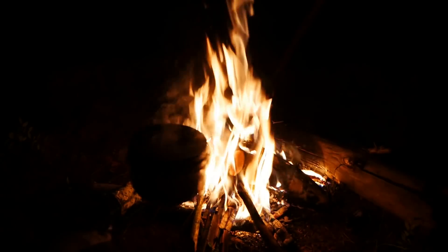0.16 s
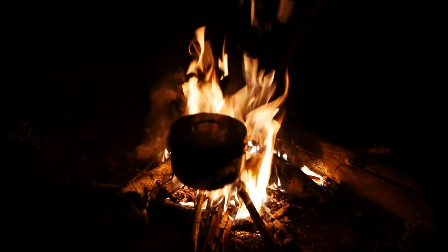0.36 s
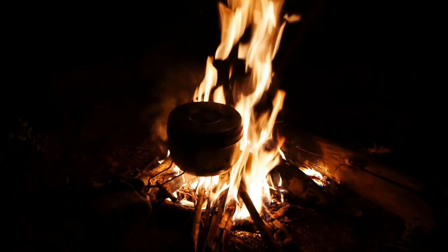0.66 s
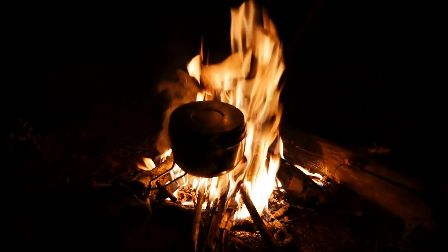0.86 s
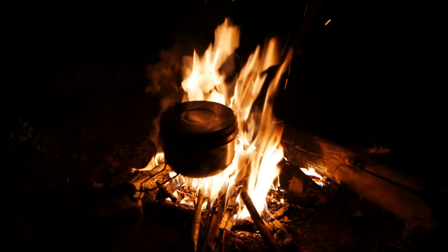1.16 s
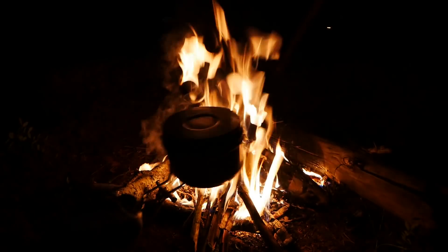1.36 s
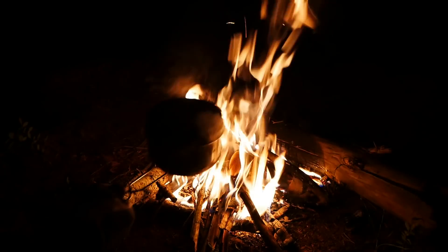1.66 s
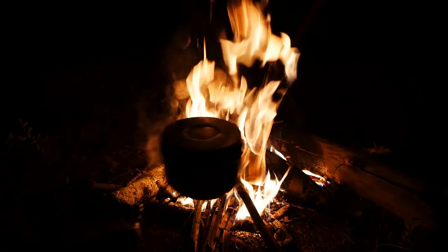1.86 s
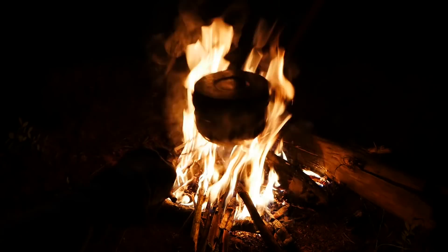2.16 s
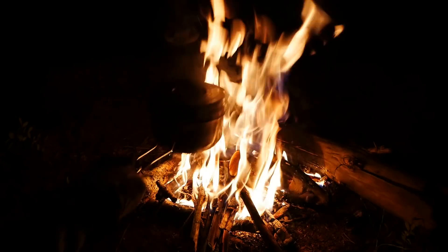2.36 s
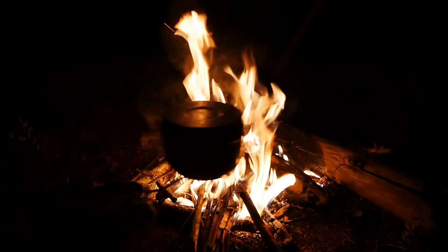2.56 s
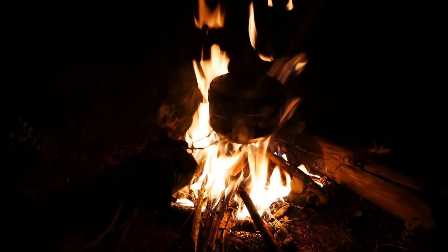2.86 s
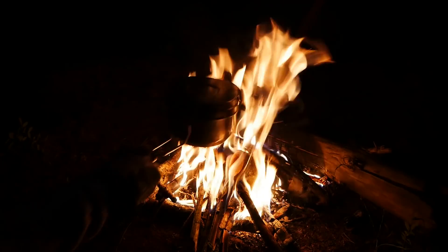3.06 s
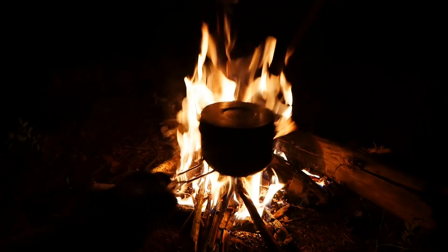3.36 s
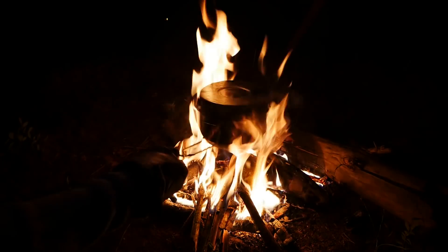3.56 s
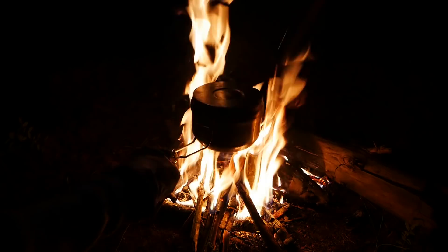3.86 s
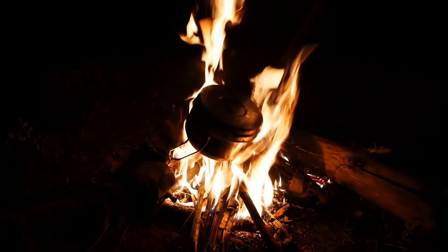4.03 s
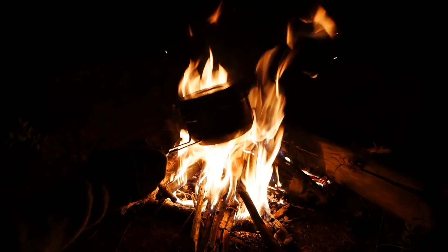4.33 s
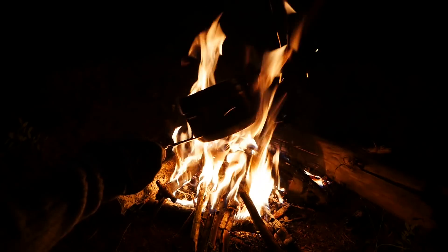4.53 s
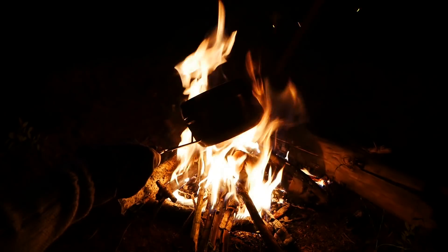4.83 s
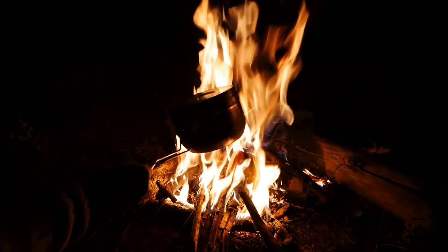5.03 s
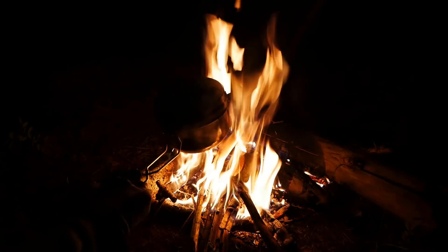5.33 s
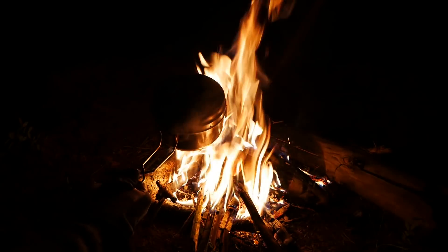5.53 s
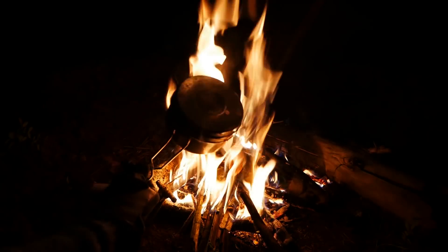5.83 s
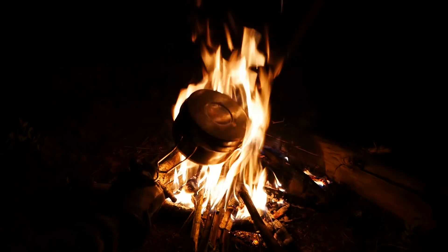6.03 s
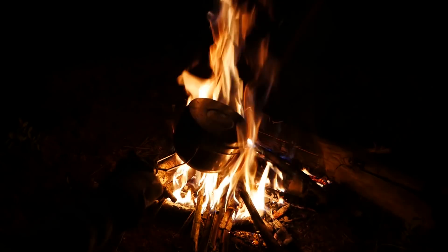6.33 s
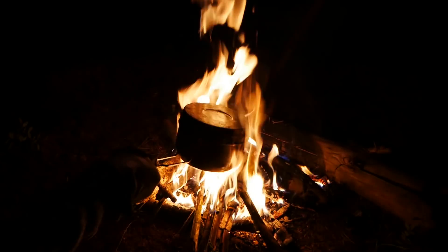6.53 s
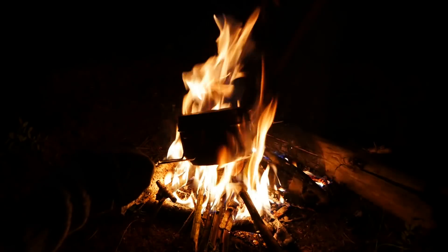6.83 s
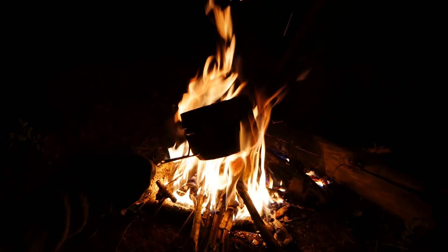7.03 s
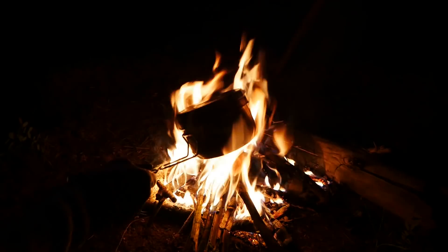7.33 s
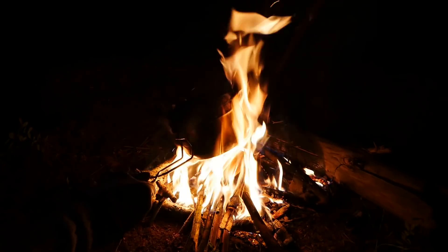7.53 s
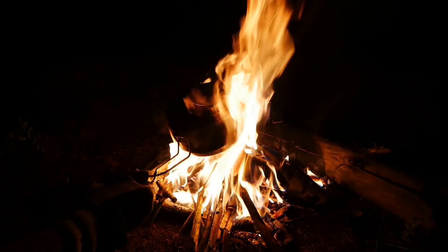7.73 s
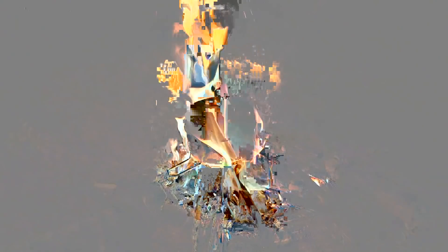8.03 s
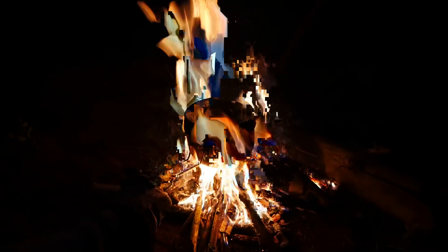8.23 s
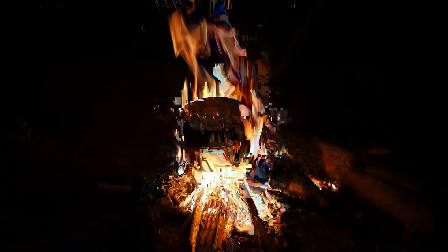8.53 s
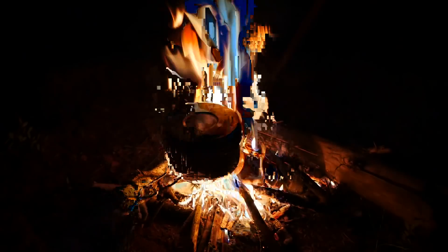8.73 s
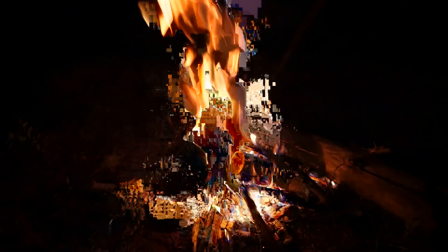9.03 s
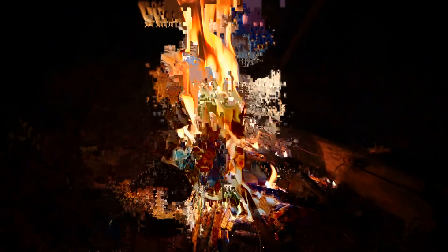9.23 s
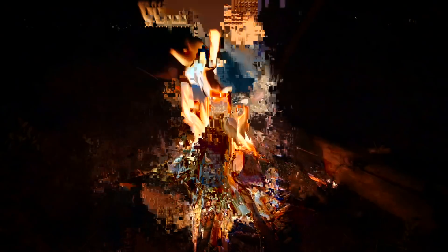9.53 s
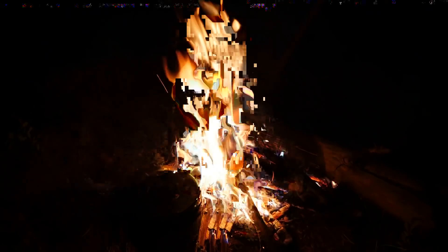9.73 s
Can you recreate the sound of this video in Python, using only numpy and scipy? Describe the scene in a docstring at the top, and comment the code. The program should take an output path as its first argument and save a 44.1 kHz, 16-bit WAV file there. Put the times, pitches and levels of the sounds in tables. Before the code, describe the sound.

Short, damped wire clinks and a hollow metal pot with a chattering lid dominate, heard close in open air with hardly any echo. They cluster early, thin out around two to four seconds, then return with a bright clang near six. Weightier knocks close the scene. Beneath them run a low fluttering fire, rustling embers, fine high crackle and dry snaps, with a light haze added late. The image is almost mono.

```python
"""A lidded camp pot swings on its wire bail over a wood fire and is pushed about on its hook.
The wire scrapes, clinks and finally knocks: short damped modes, a noisy crack and the thud of the load.
The pot booms and its loose lid clangs, as beating metal modes; jerks of the wire ring it faintly too.
Flames rumble and flutter as shaped noise; wood snaps, embers rustle, a high hiss crackles; a haze joins late.
Place: outdoors at night. Distance: close by, little tail. Microphone: two ports, nearly mono."""
import sys
import numpy as np
from scipy import signal
from scipy.fft import rfft, irfft, next_fast_len
from scipy.io import wavfile

SR = 44100
rng = np.random.default_rng(int(sys.argv[2]) if len(sys.argv) > 2 else 0)


def wav_record(signal):
    """Record a signal, one row per channel, as 16-bit PCM in the file named by sys.argv[1]."""
    frames = np.transpose(np.atleast_2d(signal))
    bounded = np.clip(frames, -1, 1)
    # unit amplitude maps onto the largest positive 16-bit level
    quanta = np.round(bounded * 32767).astype(np.int16)
    wavfile.write(sys.argv[1], SR, quanta)


N = 435705
T = np.arange(N) / SR

# level of the flames: (time [s], level [dB])
FLAME_LEVEL = [(0.0, -42), (0.82, -38.5), (1.18, -40), (7.26, -40.5), (8.34, -45.5), (8.89, -41),
               (9.22, -43.5), (9.88, -42.5)]
# level of the high hiss and its fine crackle, swelling around some of the hits: (time [s], level [dB])
HISS_LEVEL = [(0.0, -58.5), (1.9, -56.5), (2.01, -58.5), (3.19, -64.5), (3.96, -61.5), (4.1, -56.5),
              (5.03, -64.5), (5.89, -62), (6.22, -62), (6.35, -57), (7.07, -68.5), (7.62, -61.5),
              (7.81, -63), (9.05, -59), (9.24, -63.5), (9.88, -63)]
# level of the rustle, mostly from the embers, before its offset: (time [s], level [dB])
EMBER_LEVEL = [(0.0, -63), (0.46, -57), (0.95, -63), (1.11, -57), (1.47, -61.5), (1.74, -57.5), (2.88, -67),
               (3.43, -63), (3.9, -70), (4.5, -61.5), (4.88, -66.5), (6.33, -59), (6.79, -66.5),
               (7.32, -60.5), (9.12, -57), (9.37, -62), (9.8, -54.5)]
# spectra of the flames' rumble and flutter and of the high hiss: (frequency [Hz], density [dB per Hz])
RUMBLE_SPECTRUM = [(18, 6), (30, -8), (60, -1.5), (90, -2.5), (130, -6.5), (200, -13.5), (400, -45)]
FLUTTER_SPECTRUM = [(70, -23), (150, 0), (250, -4), (400, -9), (700, -16), (1200, -26), (2500, -37),
                    (6000, -64)]
HISS_SPECTRUM = [(800, -4), (2000, 8.5), (3200, 4), (5500, -2.5), (8200, 7), (10500, -10), (13000, 5.5),
                 (16000, -12.5)]
RUMBLE_DB, FLUTTER_DB = 2.5, -4.5   # against the flame level
HISS_DB, SPARKS_DB = 3.5, 2.5   # against the hiss level
EMBERS_DB, EMBERS_PER_S = 4, 300   # offset of the whole rustle; mean rate of its bursts

# blows on the pot: (time [s], strength [dB], height [0 bottom to 1 lid],
# mode that sings on [Hz], its level [dB])
POT_BLOWS = [(0.069, -46.5, 0, 1088, -60), (1.155, -21, 0.013, 1484, -39.5),
             (1.204, -31.5, 0.25, 1766, -52), (1.881, -48, 0.37, 1088, -55),
             (4.062, -30.5, 0.81, 1728, -40), (4.218, -30, 0.34, 1088, -47.5), (5.148, -35, 0, 1766, -70),
             (5.572, -41.5, 0.25, 1728, -54), (5.986, -28, 1, 3833, -36.5), (5.995, -23, 0.87, 1728, -26.5),
             (6.366, -31.5, 0.18, 1088, -61), (7.12, -25.5, 0.37, 1728, -31),
             (7.318, -29, 0.079, 1728, -47), (7.601, -24.5, 0.057, 1728, -45),
             (7.845, -42.5, 0.071, 1728, -56), (8.251, -33.5, 0.25, 1728, -48),
             (8.991, -42, 0.22, 1088, -41), (9.533, -25, 0.096, 1152, -44)]
# modes of the pot: (frequency [Hz], level [dB], t60 [s])
POT_MODES = [(471, 9.5, 0.069), (560, 15, 0.013), (651.5, 9.5, 0.13), (724, 6, 0.0057), (1088, -7, 0.63),
             (1123, 0.5, 0.23), (1152, -13, 0.38), (1508, -13, 0.71), (1728, -14.5, 0.8), (1766, 4, 0.21),
             (1940, -7, 0.19), (2070, -9, 0.36), (2174, -5.5, 0.25), (2260, -1, 0.36), (2300, -12, 0.54),
             (2880, -4.5, 0.027), (3144, -8, 0.57), (3600, 0.5, 0.35), (3833, -27, 0.37), (4000, 1, 0.26),
             (4320, -11, .16), (4270, -1, 0.37), (4535, 3.5, 0.15), (4720, -5, 0.46), (5220, -2.5, 0.32),
             (5960, -2.5, 0.34), (6500, -14, 0.14), (6900, -1, 0.24), (7440, 0.5, 0.16), (7900, 3, 0.1),
             (8100, -4, .25), (10380, -30, .14), (11800, -9, 0.15)]
# answer to a blow at the bottom and at the lid: (bottom [dB], wall [dB], rim [dB], shimmer [dB])
AT_BOTTOM_DB = [1, -7.5, -7, -22.5]
AT_LID_DB = [-17.5, -14, 1, 2]

# the loudest snaps of the burning wood: (time [s], level [dB], brightness [dB])
LOUD_SNAPS = [(0.1616, -36, -0.5), (0.2463, -42, 2), (0.2745, -46.5, -11.5), (0.9672, -44, -7.5),
              (1.0108, -46, -11.5), (1.8819, -41.5, -11), (2.0293, -38.5, 0), (2.138, -42.5, 0),
              (2.235, -42.5, -2), (2.2926, -40, -6), (2.4134, -34.5, 8.5), (2.543, -39.5, 0.5),
              (3.0212, -52, 13), (3.4467, -49, 2.5), (4.468, -34.5, 6.5), (4.5234, -39.5, 1),
              (4.546, -36.5, 2), (5.0447, -43.5, 6.5), (5.0814, -37, 1.5), (5.3808, -43, 6.5),
              (5.8573, -37, 4.5), (6.554, -43, 1), (9.1084, -38, -1), (9.1517, -39.5, 2),
              (9.2277, -37.5, 11.5), (9.295, -43, 6)]
SMALL_SNAPS_PER_S, SMALL_SNAP_DB, SNAP_SPREAD_DB = 5, -51, 2.5   # fainter ones come at random

# the wire slides and scrapes: (time [s], length [s], level before a common cut [dB])
SLIDES = [(0.357, 0.029, -27.5), (1.153, 0.054, -38), (2.224, 0.018, -42.5), (2.366, 0.048, -51),
          (3.655, 0.04, -53.5), (4.614, 0.011, -45), (4.675, 0.017, -40), (5.972, 0.012, -25.5),
          (5.994, 0.035, -39), (8.876, 0.018, -25), (8.916, 0.027, -32.5), (9.515, 0.031, -38)]
# the bail slips on its hook: (time [s], ring [dB], brightness [dB], thud of the load [dB])
CLINKS = [(0.3874, -21.5, -3, -24.5), (0.5324, -42.5, 5, -37), (0.5439, -35.5, -6, -47),
          (0.556, -25.5, 2.5, -35), (0.5834, -31.5, 4.5, -44), (0.6237, -32.5, -0.5, -51),
          (0.7227, -28.5, -2.5, -35.5), (0.7316, -36.5, -5, -48), (0.8709, -16, 0, -32),
          (1.0339, -40.5, -8, -36.5), (1.0548, -44, -4, -53), (1.1398, -27, 1, -26.5),
          (1.6568, -20, 0.5, -29.5), (1.7992, -37.5, 3.5, -50), (3.1218, -37.5, -5.5, -39),
          (3.9816, -22.5, -4, -17), (4.051, -32.5, -2.5, -35), (4.0628, -27.5, 0, -35),
          (4.0787, -31.5, 1, -30), (4.1541, -26.5, 0.5, -21), (4.1995, -21, -1, -29.5),
          (5.5007, -29, -3, -27), (5.5093, -30.5, 0.5, -37), (5.9343, -39.5, -2, -40),
          (5.962, -33, 0.5, -18.5), (6.2529, -21, 3.5, -26.5), (6.3241, -25, 1, -18),
          (7.0427, -26, 5.5, -34), (7.0913, -32.5, -3.5, -21), (7.177, -42.5, 1, -55),
          (7.2961, -42.5, 3, -21), (7.3724, -38.5, -3, -49), (7.5439, -43, 4.5, -55), (7.5859, -42, 2, -55),
          (7.597, -43.5, 8, -22), (7.699, -36, -1, -38), (7.7151, -35.5, -3.5, -33),
          (7.7561, -37.5, 1.5, -26), (7.7906, -29.5, -4, -18.5)]
# heavier knocks as the pot is worked off the hook:
# (time [s], ring [dB], brightness [dB], thud of the load [dB])
KNOCKS = [(8.152, -27, -3, -19), (8.2256, -28.5, -4, -12.5), (8.2891, -37, 7.5, -12.5),
          (8.3254, -32, -3, -16), (8.5911, -43, -3.5, -32.5), (8.6422, -32, -6.5, -16.5),
          (8.6695, -29.5, -3.5, -18.5), (8.7387, -25, 0, -14.5), (8.8815, -17.5, 1.5, -18.5),
          (8.9293, -31, -3, -21.5), (8.9347, -25, -0.5, -45), (8.9437, -35, -5, -30),
          (8.9582, -27.5, -2.5, -28), (8.9835, -28, 0, -16.5), (9.0298, -20, -2, -13.5),
          (9.5138, -19, -3, -14.5), (9.6195, -19.5, -2, -21), (9.8207, -25.5, 0.5, -25),
          (9.8629, -27.5, -5.5, -28), (9.8754, -30, -5, -27)]
# modes of the wire bail and of the loaded hook: (frequency [Hz], level [dB], t60 [s])
BAIL_MODES = [(1922, -12.5, 0.044), (1962, -5.5, 0.029), (2700, 0, 0.018), (3260, -2, 0.027),
              (3252, 6, 0.02), (3355, -35.5, 0.61), (4207, -0.5, 0.017), (4473, -20.5, 0.12),
              (5325, -2, 0.033), (6100, -19, 0.12), (6490, -1, 0.026), (7760, -14, 0.17), (7410, -8, 0.12),
              (8100, 4.5, 0.019), (8900, -10, 0.049), (11100, -70, 0.01), (12100, -43, 0.019)]
HOOK_MODES = [(1455, -42, 0.0089), (1880, -8.5, 0.028), (2108, -8.5, 0.028), (2500, -28, 0.059),
              (2847, 0, 0.02), (3850, -10, 0.024), (4690, 16.5, 0.012), (5160, 7.5, 0.032),
              (6700, -13, 0.44), (6860, 5, 0.036), (7450, -7.5, 0.28), (7900, 13, 0.03), (9470, -13, 0.029),
              (10600, -45.5, .03), (14000, -6, .025)]
# the hanging load thuds lower while the hanger is slack
TAUT_HZ, SLACK_HZ, SLACK_FROM_S, SLACK_TO_S = 255.5, 158, 6.9, 8.0

# a smooth haze that sets in late: (frequency [Hz], density [dB per Hz])
HAZE_SPECTRUM = [(500, -3), (1500, 10), (3000, 8.5), (5500, 10.5), (8000, 3.5), (11000, -13), (16000, -6)]
HAZE_FROM_S, HAZE_DB = 7.945, -55.5

# faint noise of the microphone ports: (frequency [Hz], density [dB per Hz])
PORT_NOISE = [(40, -6), (200, -4), (1300, -9.5), (15000, -9.5)]
PORT_NOISE_DB = -68
SCATTER_TREBLE_DB, SCATTER_DB = -27.5, -36.5   # port difference, against the mid signal
CUTOFF_HZ = 16000


def from_db(db):
    """Amplitude factor of a level in dB."""
    return 10 ** (np.asarray(db) / 20)


def rms_one(x, over_s=None):
    """Scale to rms 1, over the whole length or over its beginning."""
    part = x if over_s is None else x[:int(over_s * SR)]
    return x / np.sqrt(np.mean(part ** 2) + 1e-20)


def band(x, low_hz, high_hz):
    """Band-pass, with edges held between 10 Hz and 0.45 of the sample rate."""
    edges = np.clip([low_hz, high_hz], 10, .45 * SR)
    return signal.sosfilt(signal.butter(2, edges, "band", fs=SR, output="sos"), x)


def fade(t, t60):
    """Exponential decay by 60 dB in t60 seconds."""
    return np.exp(-np.log(1000) * t / t60)


def add(track, s, sound):
    """Mix a sound into a track from time s on."""
    i = int(np.clip(round(s * SR), 0, N - 1))
    track[i:i + len(sound)] += sound[:N - i]


def drift(rate):
    """Random wandering with rms 1, through rate knots a second."""
    knots = rng.standard_normal(4000)
    return rms_one(np.interp(T * rate, np.arange(len(knots)), knots))


def coloured(spectrum):
    """Noise of the given spectrum, rolled off beyond both ends, rms 1."""
    hz, db = np.transpose(spectrum)
    size = next_fast_len(N)
    f = np.maximum(np.fft.rfftfreq(size, 1 / SR), 1)
    roll_off = 1 + (f / (2 * hz[-1])) ** 4 + (hz[0] / (2 * f)) ** 2
    gain = from_db(np.interp(np.log(f), np.log(hz), db)) / roll_off
    return rms_one(irfft(rfft(rng.standard_normal(size)) * gain, size)[:N])


def modes_of(modes, t):
    """One decaying sine per mode."""
    hz, db, t60 = np.transpose(modes)[:, :, None]
    return from_db(db) * np.sin(2 * np.pi * hz * t) * fade(t, t60)


def strengths(modes, scatter_db):
    """Each blow lands elsewhere and so weights the modes anew, in either polarity."""
    signs = rng.choice([-1, 1], len(modes))
    return from_db(scatter_db * rng.standard_normal(len(modes))) * signs


def crackle(per_s, clump_db, low_hz, high_hz):
    """Tiny bursts in clumps, each at one of eight pitches and under 17 ms long; rms 1."""
    born = rng.random(N) < per_s * from_db(clump_db * drift(9)) / SR
    sizes = born * from_db(5 * np.minimum(rng.exponential(1, N), 3))
    pitches, t = np.geomspace(low_hz, high_hz, num=8), T[:SR // 60]
    dealt = rng.integers(0, len(pitches), N)
    out = np.zeros(N)
    for k, hz in enumerate(pitches):
        noise = rng.standard_normal(len(t)) * fade(t, 0.019)
        burst = rms_one(band(noise, hz / 0.96, hz * 1.41))
        out += signal.oaconvolve(sizes * (dealt == k), burst)[:N]
    return rms_one(out)


def fire():
    """Flames rumble and flutter in lumps; embers rustle; above them a high hiss with fine crackle."""
    flames_db = np.interp(T, *np.transpose(FLAME_LEVEL))
    hiss_db = np.interp(T, *np.transpose(HISS_LEVEL))
    embers_db = np.interp(T, *np.transpose(EMBER_LEVEL))
    rumble = from_db(flames_db + RUMBLE_DB) * coloured(RUMBLE_SPECTRUM)
    flutter = from_db(flames_db + FLUTTER_DB + 3.05 * drift(25)) * coloured(FLUTTER_SPECTRUM)
    rustle = crackle(per_s=EMBERS_PER_S, clump_db=3.5, low_hz=960, high_hz=3860)
    embers = from_db(embers_db + EMBERS_DB) * rustle
    hiss = from_db(hiss_db + HISS_DB + drift(30)) * coloured(HISS_SPECTRUM)
    sparks = from_db(hiss_db + SPARKS_DB) * crackle(per_s=180, clump_db=4.5, low_hz=4700, high_hz=10300)
    return rumble + flutter + embers + hiss + sparks


def pot(chatter_per_s, chatter_t60, chatter_db, rasp_db, sing_t60):
    """Thin metal rings in four registers, brighter when struck higher; the lid chatters, a mode sings on."""
    out, sing_t, ring_t, chatter_t = np.zeros(N), T[:SR], T[:SR // 2], T[:SR // 8]
    edges_hz, attack_s = [400, 900, 1350, 2800, 12000], .04
    mode_hz, mode_db = np.array(POT_MODES)[:, :1], np.array(POT_MODES)[:, 1]
    register = np.digitize(mode_hz[:, 0], edges_hz[1:-1])
    waves, weights = modes_of(POT_MODES, ring_t), from_db(mode_db)
    for s, blow_db, height, sing_hz, sing_db in POT_BLOWS:
        levels_db = blow_db + (1 - height) * np.array(AT_BOTTOM_DB) + height * np.array(AT_LID_DB)
        # the blow itself, then the random touches of the loose lid
        touches = rng.random(len(chatter_t)) < chatter_per_s / SR
        force = touches * rng.standard_normal(len(chatter_t))
        force *= from_db(chatter_db) * fade(chatter_t, chatter_t60)
        force[0] = 1
        # a dented pot splits each mode into close neighbours, which beat
        split_hz = mode_hz * rng.uniform(0.001, 0.0134, (len(POT_MODES), 1))
        beating = waves * (1 + 0.9 * np.cos(2 * np.pi * split_hz * ring_t))
        driven = signal.fftconvolve(beating, force[None], axes=1)[:, :len(ring_t)]
        rung = np.array([rms_one(wave, attack_s) for wave in driven])
        struck = weights * strengths(POT_MODES, scatter_db=1.5)
        rasp = rng.standard_normal(len(ring_t)) * fade(ring_t, 0.3)
        for k, level_db in enumerate(levels_db):
            tone = rms_one((struck * (register == k)) @ rung, attack_s)
            rough = rms_one(band(rasp, edges_hz[k], edges_hz[k + 1]), attack_s)
            rough_gain = from_db(rasp_db + 0.61 * k)   # the top is the roughest
            add(out, s, from_db(level_db) * (tone + rough_gain * rough))
        singing = np.sqrt(2) * np.sin(2 * np.pi * sing_hz * sing_t) * fade(sing_t, sing_t60)
        add(out, s, from_db(sing_db) * singing)
    return out


def snaps(body_t60, edge_t60):
    """Gas pockets burst in the wood: very short dry cracks, listed loud ones and random faint ones."""
    out, t, attack_s = np.zeros(N), T[:SR // 30], .004
    small_times = T[rng.random(N) < SMALL_SNAPS_PER_S / SR]
    small = [(s, *rng.normal([SMALL_SNAP_DB, 0], SNAP_SPREAD_DB)) for s in small_times]
    for s, db, bright_db in list(LOUD_SNAPS) + small:
        body_noise, edge_noise = rng.standard_normal((2, len(t)))
        body = rms_one(band(body_noise * fade(t, body_t60), 780, 3300), attack_s)
        edge = rms_one(band(edge_noise * fade(t, edge_t60), 2640, 13700), attack_s)
        add(out, s, from_db(db - bright_db) * body + from_db(db + bright_db) * edge)
    return out


def slides(slips_per_s, grit_db):
    """Wire drags over wire: a swelling run of tiny slips that ring the bail."""
    out = np.zeros(N)
    body = strengths(BAIL_MODES, scatter_db=5.5) @ modes_of(BAIL_MODES, T[:SR // 8])
    for s, length_s, db in SLIDES:
        swell = np.linspace(0, 1, max(int(length_s * SR), 8))
        slips = (rng.random(SR) < slips_per_s / SR) * rng.standard_normal(SR)
        force = np.pad(slips[:len(swell)] * swell, (0, len(body)))
        tone = rms_one(signal.fftconvolve(force, body)[:len(force)], length_s)
        grit = rms_one(band(force, 610, 19000), length_s)
        add(out, s, from_db(db - 4.5) * (tone + from_db(grit_db) * grit))
    return out


def wire_hits(hits, modes, thud_s, crack_db, crack_t60, grit_db, hollow_db, hollow_hz, buzz_db,
              middle_db, bounce_s, bounce_db):
    """A jerk of the wire: a damped thud of the load, short modes, a crack of contact, one light bounce."""
    out, t = np.zeros(N), T[:SR // 4]
    edges_hz, attack_s = [600, 2400, 4500, 12500], .012
    register = np.digitize(np.array(modes)[:, 0], edges_hz[1:-1])
    waves = modes_of(modes, t)
    contact_fade = fade(t, crack_t60) + from_db(buzz_db) * fade(t, 0.098)   # crack, then buzz
    contact = rng.standard_normal((len(hits), len(t))) * contact_fade
    cracks = [band(contact, low, high) for low, high in zip(edges_hz, edges_hz[1:])]
    crack_gain = from_db([grit_db + 3, grit_db, crack_db])
    hollow = rms_one(-np.sin(2 * np.pi * hollow_hz * t) * fade(t, 0.017), attack_s)
    for i, (s, ring_db, bright_db, thud_db) in enumerate(hits):
        thud_hz = SLACK_HZ if SLACK_FROM_S < s < SLACK_TO_S else TAUT_HZ
        thud = rms_one(-np.sin(2 * np.pi * thud_hz * t) * t * np.exp(-t / thud_s), attack_s)
        weights, ring = strengths(modes, scatter_db=3), np.zeros(len(t))
        # a harder contact tips the ring toward the treble
        for k, tilt_db in enumerate([-bright_db, middle_db, bright_db]):
            tone = rms_one((weights * (register == k)) @ waves, attack_s)
            crack = crack_gain[k] * rms_one(cracks[k][i], attack_s)
            ring += from_db(ring_db + tilt_db) * rms_one(tone + crack, attack_s)
        add(out, s, ring + from_db(thud_db) * (thud + from_db(hollow_db) * hollow))
        add(out, s + bounce_s * rng.uniform(.75, 1.25), from_db(bounce_db) * ring)
    return out


def pot_in_sympathy(level_db):
    """Every jerk of the wire passes faintly into the wall and rim of the pot."""
    jerks = np.zeros(N)
    wall = [mode for mode in POT_MODES if 1000 < mode[0] < 3400]
    for s, ring_db, bright_db, _ in list(CLINKS) + list(KNOCKS):
        add(jerks, s, from_db([ring_db - bright_db + level_db]))
    ring = rms_one(strengths(wall, scatter_db=1) @ modes_of(wall, T[:SR]), .05)
    return signal.fftconvolve(jerks, ring)[:N]


def haze():
    """An even, smooth hiss over the last seconds."""
    return from_db(HAZE_DB) * (T > HAZE_FROM_S) * coloured(HAZE_SPECTRUM)


def clearing(x, wet_db, t60):
    """Ground and undergrowth scatter back a thin, short tail."""
    t = T[:SR // 2]
    tail = band(rng.standard_normal(len(t)) * fade(t, t60) * (t > .005), 89, 11200)
    return from_db(wet_db) * signal.fftconvolve(x, tail / np.linalg.norm(tail))[:N]


def microphone_ports(mid):
    """The ports differ faintly, by scattered sound and noise of opposite sign in each."""
    t = T[:SR // 100]
    scatter = rng.standard_normal(len(t)) * (t > .001)
    scattered = signal.fftconvolve(mid, scatter / np.linalg.norm(scatter))[:N]
    side = from_db(SCATTER_TREBLE_DB) * band(scattered, 3400, .45 * SR)
    side += from_db(SCATTER_DB) * scattered
    side += from_db(PORT_NOISE_DB) * coloured(PORT_NOISE)
    return np.array([mid + side, mid - side])


def scene():
    """Pot, wire and snaps with their outdoor tail, over the fire and the haze, at two close ports."""
    flames = fire()
    hits = pot(chatter_per_s=330, chatter_t60=0.17, chatter_db=-7.5, rasp_db=-15.5, sing_t60=0.96)
    hits += snaps(body_t60=0.013, edge_t60=0.0095)
    hits += slides(slips_per_s=3200, grit_db=3)
    hits += wire_hits(CLINKS, BAIL_MODES, thud_s=0.0015, crack_db=1.0, crack_t60=0.014, grit_db=-12.0,
                      hollow_db=-16.5, hollow_hz=523, buzz_db=-14, middle_db=-0.5,
                      bounce_s=0.018, bounce_db=-21.5)
    hits += wire_hits(KNOCKS, HOOK_MODES, thud_s=0.0016, crack_db=3.0, crack_t60=0.014, grit_db=-5.5,
                      hollow_db=-9.5, hollow_hz=443, buzz_db=-15, middle_db=-0.5,
                      bounce_s=0.008, bounce_db=-16)
    hits += pot_in_sympathy(level_db=-25)
    return microphone_ports(hits + clearing(hits, wet_db=-18.5, t60=0.17) + flames + haze())


def record(dry):
    """Peaks beyond full scale clip; a steep low-pass then cuts the top."""
    low_pass = signal.ellip(10, .1, 85, CUTOFF_HZ, fs=SR, output="sos")
    return signal.sosfilt(low_pass, np.clip(dry, -1, 1))


dry = scene()
out = record(dry)
wav_record(out)
```